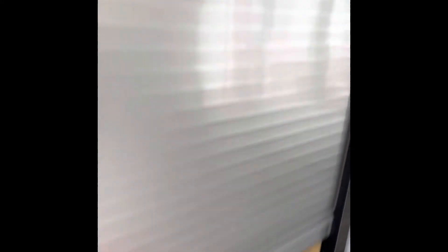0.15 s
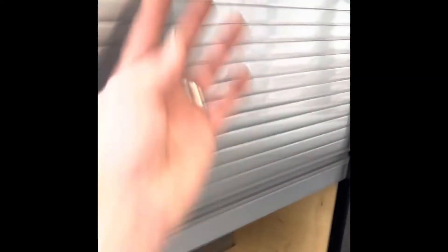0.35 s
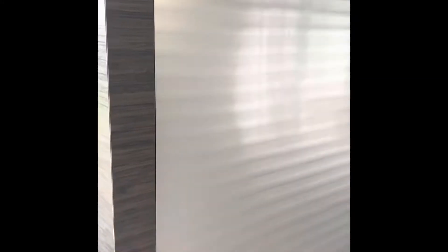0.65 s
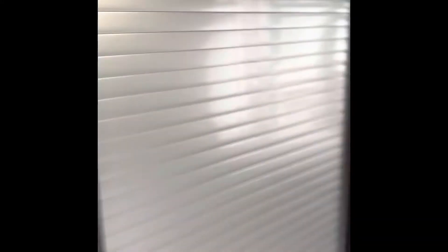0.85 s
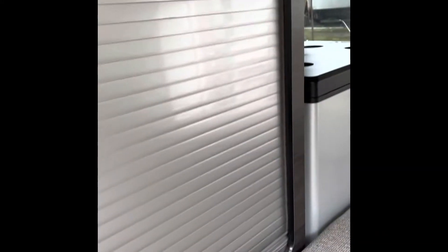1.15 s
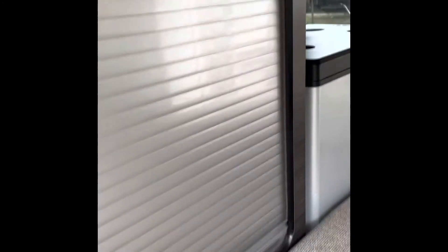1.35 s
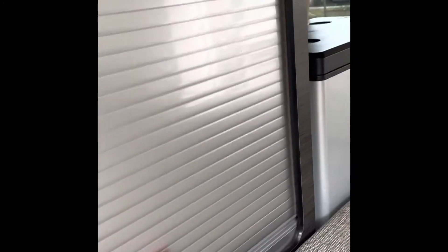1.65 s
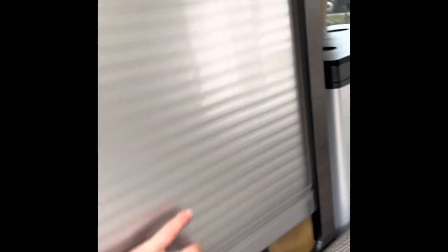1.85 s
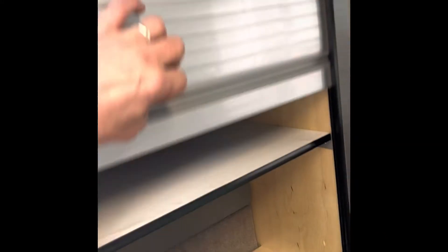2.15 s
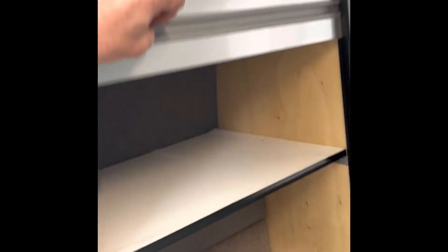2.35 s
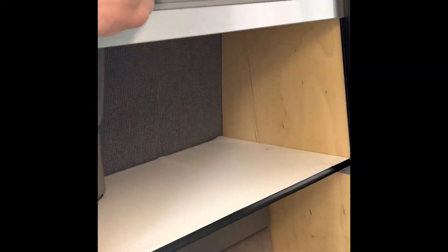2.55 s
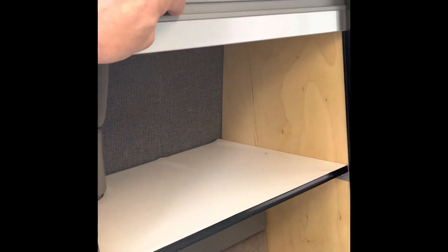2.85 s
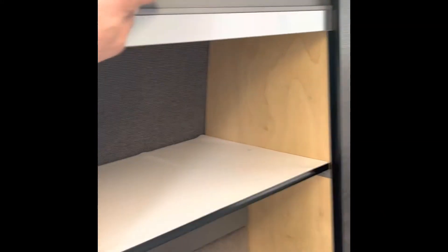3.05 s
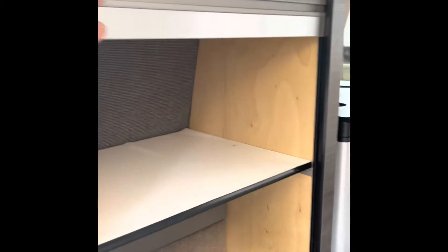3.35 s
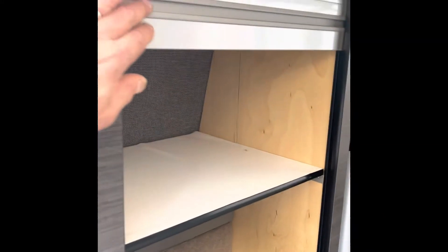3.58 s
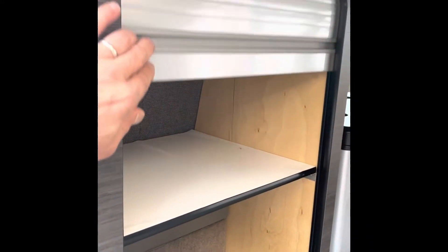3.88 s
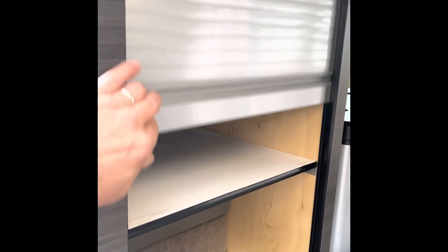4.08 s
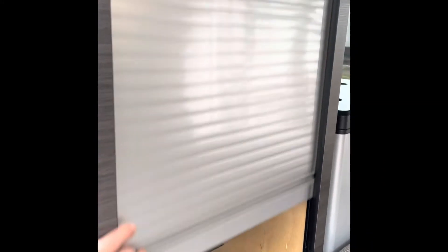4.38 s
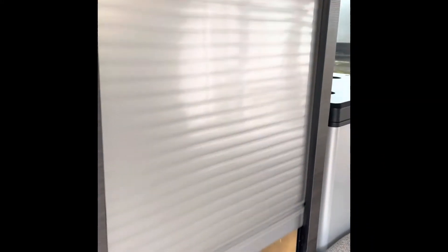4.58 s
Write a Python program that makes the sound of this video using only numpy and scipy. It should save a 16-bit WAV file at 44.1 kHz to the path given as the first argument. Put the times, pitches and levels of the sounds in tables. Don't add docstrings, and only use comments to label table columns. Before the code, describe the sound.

A slatted roll-up cabinet door rattles along its tracks by hand, slams hard once, then slides twice more in a small hollow cabin.

```python
import sys
import numpy as np
from scipy import signal
from scipy.fft import rfft, irfft, next_fast_len
from scipy.io import wavfile

SR = 44100
rng = np.random.default_rng(int(sys.argv[2]) if len(sys.argv) > 2 else 0)


def level_to_linear(level):
    exponent = np.asarray(level, float) / 20
    return 10 ** exponent


def persist_wave(psi):
    counts = np.round(np.clip(psi, -1, 1) * 32767).astype(np.int16)
    wavfile.write(sys.argv[1], SR, np.atleast_2d(counts).T)


N = 208363

# (peak time [s], level [dB], rise [s], fall [s])
BRUSH_SWELLS = [(4.54, -53, 0.045, .04), (4.65, -56, 0.42, .3), (.2, -43, 0.027, .04),
                (.44, -56.5, 0.063, 0.054), (.77, -42, .04, .04), (0.94, -69.5, .05, 0.51),
                (.885, -65.5, 0.045, 0.081), (0.072, -47, .08, .12), (5.3, -59, .2, 0.38),
                (1.05, -74, 0.088, 0.092), (1.17, -62, 0.15, 0.21), (1.41, -65.5, .3, 0.26),
                (2.55, -66, 0.1, 0.19), (2.7, -69.5, 0.2, 0.055), (2.79, -62, 0.033, 0.08),
                (3.01, -71.5, 0.19, 0.14), (3, -73.5, .03, 0.12), (3.31, -60.5, 0.065, 0.055),
                (1.68, -56, 0.064, 0.15), (1.51, -60, 0.036, 0.22), (3.9, -53.5, 0.015, 0.032)]
SLAM_S = .756


def evened(x):
    return x / np.sqrt(np.mean(x ** 2) + 1e-20)


def read(points, hz):
    f, value = np.transpose(points)
    return np.interp(np.log(hz + 1), np.log(f + 1), value)


def spread(power):
    return np.interp(np.arange(N), np.arange(0, N, 32), np.sqrt(power))


def swells(rows):
    t = np.arange(0, N, 32) / SR
    power = 0
    for peak_s, db, rise, fall in rows:
        away = np.maximum((peak_s - t) / abs(rise), (t - peak_s) / abs(fall))
        power = power + level_to_linear(db - 20 * away) ** 2
    return spread(power)


def follow(column, law, trim_db=(0, 0, 0, 0)):
    # (time [s], sliding speed [dB], weight of the hand on the panel [dB])
    strokes = [
        [(0.0, -44.5, -40), (.07, -43.5, -31.5), (.16, -41.5, -36.5), (.22, -40, -28), (.27, -49.5, -29.5),
         (.33, -62.5, -45.5), (.42, -57, -41)],
        [(.4, -61, -43), (.48, -58.5, -44), (.54, -48.5, -38.5), (.62, -52, -36.5), (.65, -44.5, -31.5),
         (.71, -42, -33), (.76, -37, -31.5), (.81, -53, -22), (.86, -64, -40.5)],
        [(1.5, -63.5, -57), (1.57, -54.5, -41.5), (1.7, -56.5, -44), (1.78, -44, -31.5), (1.88, -41.5, -30.5),
         (1.99, -34.5, -24), (2.14, -43, -34), (2.36, -41.5, -32.5), (2.51, -66, -47)],
        [(3.62, -71.5, -55.5), (3.88, -55, -42.5), (4.11, -52, -39), (4.15, -42, -37), (4.21, -39.5, -34),
         (4.33, -44.5, -35), (4.37, -51.5, -35.5), (4.5, -54, -39), (4.73, -51.5, -41)],
    ]
    at_db, per_db, rest_db = law
    t = np.arange(0, N, 32) / SR
    power = level_to_linear(rest_db) ** 2
    for rows, extra_db in zip(strokes, trim_db):
        rows = np.transpose(rows)
        control_db = np.interp(t, rows[0], rows[column], left=-200, right=-200)
        power = power + level_to_linear(at_db + extra_db + per_db * (control_db + 40)) ** 2
    return spread(power)


def add(mix, s, sound):
    part = mix[round(s * SR):][:len(sound)]
    part += sound[:len(part)]


def colour(x, points, size=16384):
    log_gain = read(points, abs(np.fft.fftfreq(size, 1 / SR))) * np.log(10) / 20
    response = np.exp(np.conj(signal.hilbert(log_gain)))
    taps = np.fft.ifft(response).real[:size // 2]
    return evened(signal.oaconvolve(x, taps)[:len(x)])


def grit(per_s, spread_db, smooth):
    size = level_to_linear(spread_db * np.minimum(rng.exponential(1, N), 4)) * rng.choice([-1, 1], N)
    catches = size * (rng.random(N) < per_s / SR)
    return evened(catches) + smooth * rng.standard_normal(N)


def flutter(hz, depth_db):
    lowpass = signal.butter(1, hz, fs=SR, output="sos")
    wander = evened(signal.sosfilt(lowpass, rng.standard_normal(N)))
    return level_to_linear(depth_db * np.clip(wander, -2, 2))


def drift(hz):
    lowpass = signal.butter(2, hz, fs=SR / 32, output="sos")
    slow = signal.sosfilt(lowpass, rng.standard_normal(N // 32 + 1))
    return np.interp(np.arange(N) / 32, np.arange(len(slow)), evened(slow))


def ring(x, hz, width):
    return signal.lfilter(*signal.iirpeak(hz, hz / width, SR), x)


def cabin(x, t60):
    t = np.arange(8000) / SR
    tail = rng.standard_normal(len(t)) * level_to_linear(-60 * t / t60)
    return signal.oaconvolve(x, tail / np.linalg.norm(tail))[:N]


def ports(direct, scattered, like, lead):
    # (frequency [Hz], left minus right [dB])
    left_tilt = [(100, -0.9), (380, -0.5), (700, -3), (1300, 0.5), (4400, -1), (8000, 0)]
    size = next_fast_len(N + 4000)
    hz, left = np.fft.rfftfreq(size, 1 / SR), rfft(direct, size)
    same = np.clip(read(like, hz), 0, 1)
    shift = np.exp(-1j * np.interp(hz, *np.transpose(lead)))
    right = left * same * shift + np.sqrt(1 - same ** 2) * rfft(scattered, size)
    lean = level_to_linear(read(left_tilt, hz) / 2)
    return irfft([left * lean, right / lean], size)[:, :N]


def air():
    # (frequency [Hz], level [dB])
    air_spectrum = [(100, -17.5), (200, 2.5), (420, -8.5), (650, -3.5), (930, -3), (1400, -10),
                    (2500, -22.5), (4000, -31), (6000, -45.5), (9000, -75.5), (15000, -95)]
    return level_to_linear(-54) * flutter(hz=3.8, depth_db=-2.5) * colour(rng.standard_normal(N), air_spectrum)


def boom():
    # (frequency [Hz], level [dB])
    hollow_spectrum = [(18, -21), (35, -16.5), (48, 5.5), (60, 5), (75, -0.5), (95, -2), (130, -18),
                       (200, -66.5), (1000, -96.5)]
    # (peak time [s], level [dB], rise [s], fall [s])
    heaves = [(0.001, -36, .1, 0.13), (.27, -30.5, 0.16, 0.51), (.72, -29, .2, 0.043),
              (.86, -34.5, 0.072, 1), (1.12, -42, .3, 0.12), (1.41, -40.5, 0.46, 0.21),
              (1.6, -33, 0.086, 0.73), (2.02, -29, 0.15, 0.1), (2.97, -39.5, 0.26, 0.13),
              (3.33, -47.5, 0.59, 0.62), (3.62, -39, 0.23, .25), (3.8, -40.5, 0.3, 0.055)]
    level = np.hypot(follow(column=2, law=(-45, 0.25, -44.5)), swells(heaves))
    return level * colour(grit(per_s=78, spread_db=4.5, smooth=2.5), hollow_spectrum)


def rub():
    # (frequency [Hz], level [dB])
    skin_spectrum = [(2500, -39), (5000, -8), (7000, -6), (10000, -11), (12500, -11), (14500, -15),
                     (16000, -29)]
    level = np.hypot(follow(column=1, law=(-47, 0.96, -93)), swells(BRUSH_SWELLS))
    hiss = colour(grit(per_s=2100, spread_db=-2.0, smooth=1.9), skin_spectrum)
    return level * flutter(hz=40.3, depth_db=1.0) * hiss


def thumps():
    # (time [s], peak level [dB], start pitch [Hz], end pitch [Hz], swell [s])
    blows = [(.7524, -9, 1150, 720, .0017), (.2095, -23, 900, 450, .002), (.658, -21.5, 190, 110, 0.0075),
             (1.573, -30, 1010, 610, 0.0014), (1.588, -25, 230.4, 150.2, 0.0057),
             (1.826, -25, 160, 100.1, .008), (2.018, -21, 190, 100, 0.0052), (2.055, -23, 240, 149.8, .007),
             (2.074, -23, 170, 100, 0.0086), (0.211, -24, 428, 131.4, 0.008),
             (0.251, -28.5, 201, 71.2, 0.03), (0.625, -24, 203.6, 99.6, 0.024),
             (.7585, -6.5, 185, 140, 0.0093), (1.3167, -22.5, 300, 80, 0.008),
             (1.380, -19.5, 260, 90, 0.01), (1.575, -22, 483, 241, 0.0031), (1.5758, -20.5, 300, 80, 0.009),
             (1.602, -26.5, 241, 74, 0.013), (1.62, -26, 200, 90, 0.0047), (1.754, -29, 230, 120, .008),
             (1.856, -24, 200, 130, .01), (1.965, -19, 190, 90, 0.006), (1.999, -19, 200, 90, .005),
             (2.037, -20, 200, 90, .005), (2.18, -27, 240, 150, .008), (2.255, -25.5, 260, 160, 0.0086),
             (3.556, -33, 423, 147, 0.0106), (4.256, -27.5, 260, 120, 0.0055)]
    out, t = np.zeros(N), np.arange(9000) / SR
    for s, db, start_hz, end_hz, swell in blows:
        hz = end_hz + (start_hz - end_hz) * np.exp(-t / (.6 * swell))
        shape = (t / swell * np.exp(.5 - .5 * (t / swell) ** 2)) ** 0.81
        add(out, s, level_to_linear(db) * shape * np.sin(2 * np.pi * np.cumsum(hz) / SR))
    return out


def tick(hz, snap_db, length, slope_db):
    t = np.arange(2000) / SR
    length = max(length, .001)
    rasp = rng.standard_normal(len(t)) * np.minimum(t / 0.0015, 1) * np.exp(-t / length)
    snap_spectrum = [(150, -54), (500, -24.5), (1500, 23.5 - slope_db), (4000, 31.5), (16000, 2 * slope_db)]
    snap = colour(rasp * np.exp(-t / 0.0047), snap_spectrum, size=1024)
    width = (.55 if hz < 2000 else .17) * hz
    body = ring(ring(rasp, hz, width), hz, width)
    return level_to_linear(snap_db) * snap / abs(snap).max() + body / abs(body).max()


def ticks():
    # (time [s], peak level [dB], ring [Hz], snap [dB])
    clacks = [(0.031, -31, 3740, 2.5), (0.06, -23.5, 3800, -14), (0.211, -31, 2620, 4),
              (0.434, -53, 4400, 11), (.645, -30.5, 4300, 6), (0.65, -36.5, 3050, 3),
              (.712, -39.5, 4740, -4), (.726, -26, 4100, 6.5), (1.727, -29, 3800, -9),
              (1.751, -31, 3870, -10), (1.849, -30, 3800, 1), (1.952, -32.5, 8450, -6),
              (4.332, -47, 3900, -3.5), (4.533, -33.5, 3280, 3.5), (4.536, -42, 8000, -6),
              (4.538, -35, 5130, 1.5), (4.538, -44, 12700, -9), (4.148, -31.5, 1900, -9),
              (1.8965, -37, 1900, -3), (4.572, -41, 3180, 9), (4.608, -45, 3300, -7),
              (4.651, -49, 3660, -8), (4.696, -35, 4100, 1)]
    # (time [s], peak level [dB], ring [Hz], snap [dB])
    nail_taps = [(1.041, -34.5, 3190, 0), (1.0395, -42, 4900, -2), (1.074, -53, 4960, -4),
                 (1.169, -47.5, 3380, 6.5), (1.172, -53, 8200, -3), (1.172, -50, 12500, -6),
                 (1.271, -51, 4800, 4), (1.377, -48.5, 4370, 4), (1.402, -27, 2950, -18),
                 (1.406, -40, 3160, -20), (1.404, -40.5, 4740, -17), (1.493, -51.5, 4850, -5),
                 (1.574, -26.5, 2950, 3), (2.701, -55.5, 3460, 5.5), (2.72, -52, 6180, -8),
                 (3.298, -40.5, 3580, -3), (3.299, -49, 12300, -8.5), (3.558, -46, 12300, -8.5),
                 (3.56, -47.5, 7900, -9), (3.319, -44, 3360, -3), (3.557, -40, 2930, 9.5),
                 (3.561, -40, 4930, 1)]
    # (time [s], peak level [dB], ring [Hz], snap [dB], length [s])
    pile_up = [(.7495, -17, 2580, -6, .002), (.751, -20.5, 7470, -6, 0.0018), (.752, -19.5, 6000, -6, .002),
               (.766, -29.5, 6600, -6, .005), (.77, -30, 4860, 1, .005), (0.75, -23, 12300, -9, .002),
               (.765, -30, 8100, -8, .005), (.766, -32, 12300, -7.5, .004), (0.745, -20, 4530, -3, .0065),
               (.7515, -9, 4730, 1.5, 0.0011), (.752, -10.5, 3260, 3, 0.0014),
               (.764, -22.5, 3340, 9.5, 0.0024), (.796, -38, 4400, -3.5, 0.0067)]
    # (time [s], peak level [dB], ring [Hz], snap [dB], length [s])
    knocks = [(.21, -23, 755, -6, 0.0031), (0.7534, -9, 850, -9, 0.0015), (.754, -17, 477, -18, 0.0022),
              (0.771, -23.5, 465, -17, 0.013), (0.799, -25.5, 1500, -9, .0047),
              (1.239, -51, 1007, -9, .003), (1.313, -39.5, 990, -5, 0.0017), (.727, -34, 1300, -6, .004),
              (1.316, -39.5, 377, -17, 0.0044), (1.374, -37, 376, -20.5, 0.0072),
              (1.571, -36, 576, 3, 0.0069), (1.602, -38.5, 775, -6, .0061), (3.298, -37.5, 1380, -3, 0.012),
              (3.563, -38, 430, -7, 0.0051)]
    rows = [(*r, 0.0039, 2.5) for r in clacks]
    rows += [(*r, -1.5) for r in pile_up]
    rows += [(*r, 0.0035, -3) for r in nail_taps]
    rows += [(*r, -5.5) for r in knocks]
    out = np.zeros(N)
    for s, db, hz, snap_db, length, slope_db in rows:
        add(out, s - .001, level_to_linear(db) * tick(hz, snap_db, length, slope_db))
    return out


def slam():
    # (frequency [Hz], level [dB], time to fade 60 dB [s], delay [s])
    cabinet_tones = [(59.8, -0.5, 0.25, .0168), (96.8, -9.5, 0.3, .011), (154.4, -18, 0.18, .012),
                     (256, -20.5, 0.18, .008), (300, -18, 0.12, 0.0093), (402, -13, 0.14, .013),
                     (450, -24, 0.148, .01), (520, -32, 0.2, .01)]
    out, t = np.zeros(N), np.arange(SR // 2) / SR
    for hz, db, t60, late in cabinet_tones:
        swell = (1 - np.exp(-t * hz / 0.35)) ** 2
        tone = np.sin(2 * np.pi * hz * t)
        add(out, SLAM_S + late, -level_to_linear(-1 + db - 60 * t / t60) * swell * tone)
    t = t[:6000]
    shiver_spectrum = [(200, -6.0), (500, 7.5), (1200, 5), (2500, 3.5), (5000, -7.0), (15000, -40.5)]
    shiver = colour(rng.standard_normal(len(t)), shiver_spectrum)
    hold = np.minimum(t / 0.0055, 1) / (1 + np.exp(np.minimum((t - .065) / 0.01, 50)))
    add(out, SLAM_S - .012, level_to_linear(-31.0) * shiver * hold)
    return out


def slat(x, hz, width):
    wander = 1 + .025 * drift(hz=6.0)
    turn = np.exp(2j * np.pi * np.cumsum(hz * wander) / SR)
    r = np.exp(-np.pi * width / SR)
    pressed = level_to_linear(4.5 * np.clip(drift(hz=14.0), -2, 2))
    ringing = signal.lfilter([1 - r], [1, -r], x * pressed * turn.conj())
    return 2 * (turn * ringing).real


def slide(bumps, press):
    # (frequency [Hz], level [dB])
    scrape_spectrum = [(1200, -33), (2000, -1.5), (2900, 2), (3700, 0), (5000, -4), (6500, -12),
                       (9000, -20.5), (15000, -38)]
    rattle_spectrum = [(250, -14.5), (400, 1), (650, -7), (1100, -5.5), (1500, -9.5), (1900, -13),
                       (2600, -13.5), (4000, -32.5), (9000, -83.5)]
    rumble_spectrum = [(60, -20), (85, -1), (120, 1.5), (180, -3), (240, -9), (320, -13.5), (450, -18),
                       (800, -48), (4000, -94)]
    # (frequency [Hz], width [Hz], level [dB])
    slat_tones = [(420, 37, -12.5), (602, 18, -1), (942, 49, -5), (1090, 66, -4), (1423, 25, -7),
                  (1879, 44, 1), (2158, 48, -3), (3210, 50, -12.5), (3697, 120, -7.5), (4140, 37, -10.5),
                  (4870, 98, -7), (7560, 77, -12.5), (8550, 230, -22), (12300, 220, -30)]
    rattle_trim = [-0.2, -0.1, 0.5, -1.5]
    # (peak time [s], level [dB], rise [s], fall [s])
    jangles = [(1.92, -38, .03, .06), (1.96, -37, .015, 0.066), (4.15, -45, 0.038, 0.045),
               (.73, -35, 0.019, 0.011), (.81, -28.5, 0.033, 0.024), (1.1, -52.5, .04, 0.092),
               (0.78, -56, .2, 0.24), (1.605, -63, 0.035, 0.044), (1.19, -61.5, .3, 0.19),
               (1.4, -64, 0.23, .1), (2.25, -36.5, 0.28, 0.21), (2.42, -41.5, 0.23, 0.04),
               (3.31, -54, 0.077, 0.16), (3.2, -48, 0.13, 0.1), (4.3, -54.5, 0.13, 0.44)]
    # (peak time [s], level [dB], rise [s], fall [s])
    shudders = [
        (.79, -22.5, 0.03, 0.12),
        (.86, -35, .05, 0.22),
        (1.02, -37, 0.082, 0.14),
        (1.25, -42.5, 0.46, 0.55),
        (1.67, -38, .15, 0.11),
    ]
    scrape_level = np.hypot(follow(column=1, law=(-40, 1.16, -79)), level_to_linear(1.5) * swells(BRUSH_SWELLS))
    rattle_level = np.hypot(follow(column=1, law=(-38.5, 0.91, -60.5), trim_db=rattle_trim), swells(jangles))
    rumble_level = np.hypot(follow(column=2, law=(-40, 1, -50)), swells(shudders))

    burst = np.exp(-np.arange(600) / SR / 0.0052)
    shake = 1 + 0.14 * signal.oaconvolve(abs(bumps), burst)[:N] / np.sqrt(SR / 140)
    catches = grit(per_s=2100, spread_db=2.5, smooth=1.7) * shake
    rung = sum(level_to_linear(db + 5.0) * slat(catches, hz, width) for hz, width, db in slat_tones)
    scraping = colour(catches, scrape_spectrum) + rung
    loose = grit(per_s=700, spread_db=0.5, smooth=1.4) * shake + 0.2 * bumps
    rattling = colour(loose, rattle_spectrum)
    rumbling = colour(bumps + 2.6 * rng.standard_normal(N), rumble_spectrum)
    return press * (scrape_level * scraping + rattle_level * rattling) + rumble_level * rumbling


def scene():
    # (frequency [Hz], likeness [0-1])
    like_near = [(100, 1), (300, 0.95), (700, 0.79), (1300, 1), (2300, 1), (2900, 0.93), (3600, 0.31),
                 (4800, 0.94), (5700, 1), (15000, 0.98)]
    like_far = [(100, .998), (300, 0.97), (700, 0.83), (1500, 0.3), (2800, .75), (4000, .35), (6000, 0.93),
                (15000, 0.92)]
    # (frequency [Hz], phase [radians])
    lead_steady = [(0, 0.1), (600, -.5), (1700, 0.6), (2700, 2.51), (3800, 1.38), (5200, 1.6), (6000, 3.14),
                   (10300, 9.42), (13400, 13.49), (14300, 15.34), (16000, 15.8)]
    lead_hits = [(0, 0), (1400, 0.5), (2300, 1.5), (3000, 2.5), (5200, 1.5), (6100, 3.5), (10300, 8.5),
                 (13400, 25.5), (14300, 24.5), (16000, 18.5)]
    bumps = grit(per_s=130, spread_db=2.3, smooth=0)
    press = flutter(hz=45.2, depth_db=1.14)
    direct, twin = (boom() + rub() + slide(bumps, press) for _ in "LR")
    tapping = ticks()
    hits = tapping + level_to_linear(-22.0) * cabin(tapping, t60=0.12) + thumps() + slam()
    mix = ports(air(), air(), like_far, lead_steady)
    mix = mix + ports(direct, twin, like_near, lead_steady)
    return mix + ports(hits, cabin(hits, t60=0.039), like_near, lead_hits)


def top_cut(x):
    return signal.sosfilt(signal.butter(12, 15720, fs=SR, output="sos"), x)


def record(dry):
    edge = signal.firwin(401, 15650, window=("kaiser", 9), fs=SR)
    x = signal.oaconvolve(dry, edge[None], "same")
    x = x / (1 + (abs(x) / .92) ** 6) ** (1 / 6)
    return top_cut(x)


dry = scene()
out = record(dry)
persist_wave(out)
```